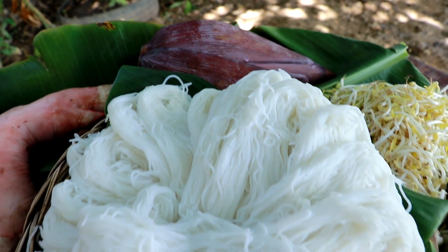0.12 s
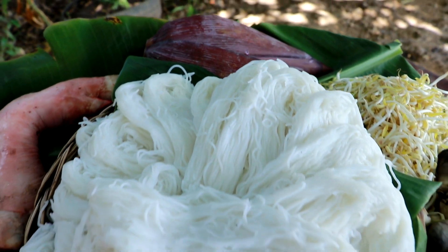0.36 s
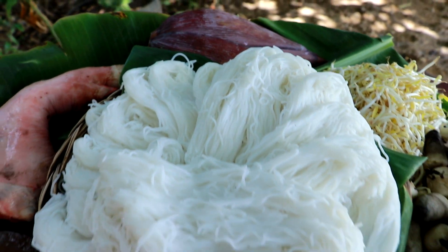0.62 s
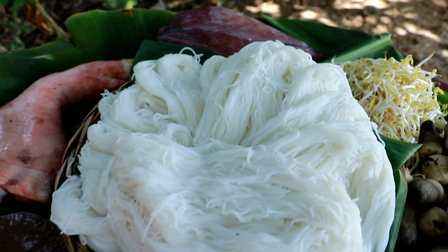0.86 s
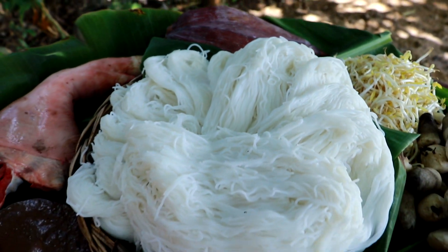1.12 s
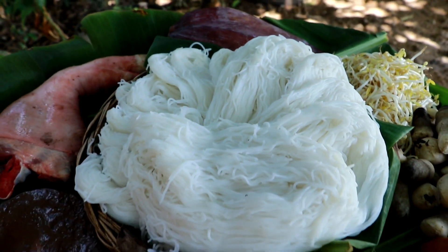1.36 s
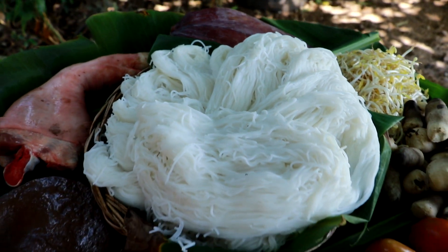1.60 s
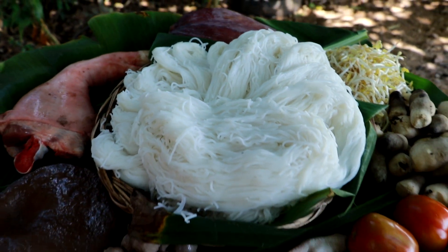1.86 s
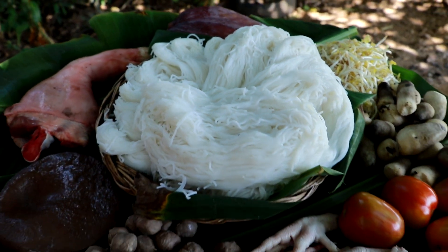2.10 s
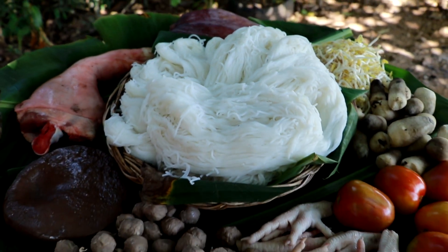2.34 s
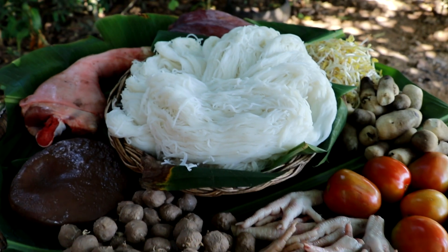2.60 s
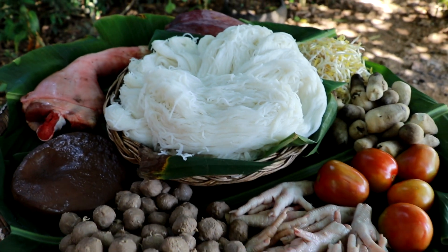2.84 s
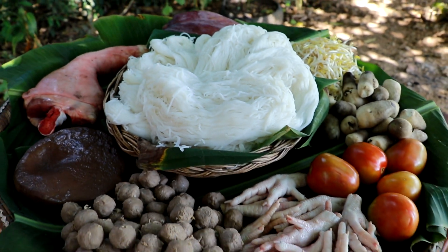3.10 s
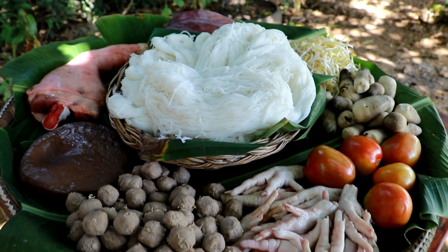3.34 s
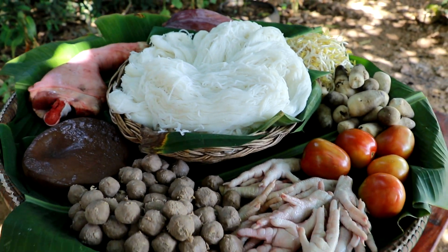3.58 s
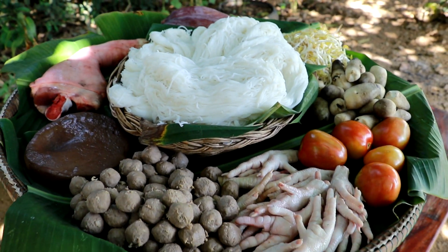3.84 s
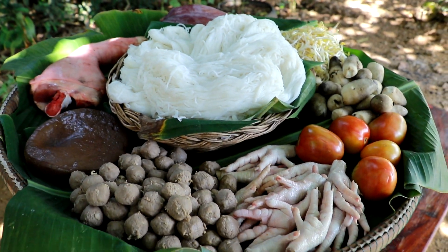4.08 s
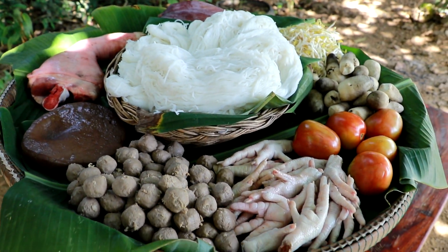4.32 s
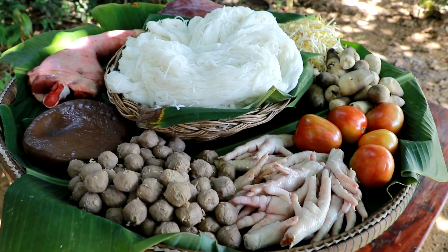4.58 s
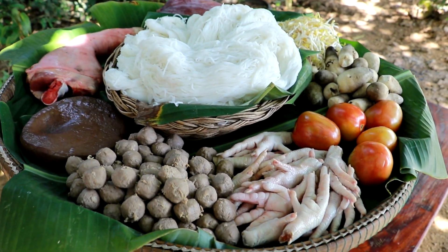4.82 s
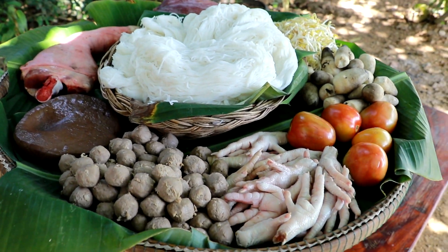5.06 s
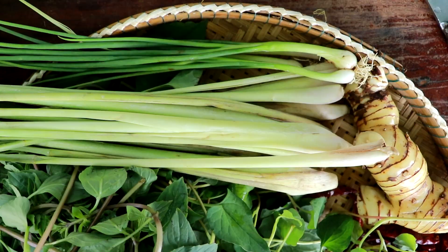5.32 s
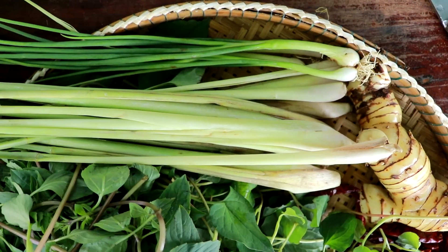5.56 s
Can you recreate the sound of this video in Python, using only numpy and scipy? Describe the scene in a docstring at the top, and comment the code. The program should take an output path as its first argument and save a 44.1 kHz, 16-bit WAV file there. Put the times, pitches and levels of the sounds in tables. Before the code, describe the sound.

Outdoors in a quiet garden, a handheld camera's stereo microphone picks up soft leafy hiss and low rumble. An insect trills in short high phrases about every second, while a small bird sings quick gliding whistles in the first two seconds. Small lens motor ticks come irregularly up close; a plastic snap falls after four seconds, then a tiny silent cut, fuller background, and a loud button click on the right.

```python
"""Shady garden near a handheld camera

An insect trills in strokes of falling pitch and a small bird sings in gliding whistles, with echoes of decaying noise.
Behind them, shaped noise makes a far rumble, leafy hiss and blurred calls; a wavering tone makes a faint hum.
Up close, sharp knocks and fading noise ring the resonances of the ticking lens motor, the snapping shell and
a clicking button; a finger tap is one short, soft tone. A brief silence joins two shots with different backgrounds.
"""
import sys
import numpy as np
from scipy import signal
from scipy.fft import rfft, irfft, next_fast_len
from scipy.io import wavfile
from scipy.ndimage import uniform_filter1d, map_coordinates

SR = 44100
rng = np.random.default_rng(int(sys.argv[2]) if len(sys.argv) > 2 else 0)


def wav_out(sig):
    """Save sig, one row per channel (or a flat mono array), as 16-bit PCM at SR to the path in sys.argv[1]."""
    wavfile.write(sys.argv[1], SR, np.round(np.clip(np.atleast_2d(sig).T, -1, 1) * 32767).astype(np.int16))


def voltage_ratio(decibels):
    """Convert decibels (scalar or array-like) to amplitude ratios, 20 dB per decade."""
    exponent = np.asarray(decibels, float) / 20
    return 10 ** exponent


N = 250929  # length in samples
GAP_START_S, GAP_END_S = 5.262, 5.3218  # silence between the two shots


def unit(x):
    """Scales a sound to rms 1."""
    return x / np.sqrt(np.mean(x ** 2) + 1e-20)


def along(points, hz):
    """Reads a curve of (Hz, value) points on a logarithmic frequency axis."""
    f, v = np.transpose(points)
    return np.interp(np.log(hz + 1), np.log(f + 1), v)


def wobble(rate):
    """A smooth random curve with this many random points a second."""
    points = rng.standard_normal(int(N * rate / SR) + 4)
    return map_coordinates(points, [np.arange(N) * rate / SR])


def filtered(x, response):
    """Shapes a sound by a response, real or complex, that depends on frequency."""
    m = next_fast_len(x.shape[-1] + 8192)
    spectrum = rfft(x, m) * response(np.fft.rfftfreq(m, 1 / SR))
    return irfft(spectrum, m)[..., :x.shape[-1]]


def resonances(peaks):
    """The response of parts that ring at their own pitches, with alternating signs."""
    def response(f):
        total = 0
        for k, (centre, width, db) in enumerate(peaks):
            ring = 1j * f * width / (centre * centre - f * f + 1j * f * width)
            total = total + (-1) ** k * voltage_ratio(db) * ring
        return total
    return response


def add(track, s, sound):
    """Mixes a sound into a track, starting at s seconds."""
    at = round(s * SR)
    track[..., at:at + sound.shape[-1]] += sound[..., :N - at]


def sides(pan_db):
    """Left and right gains that differ by pan_db."""
    return voltage_ratio([[pan_db / 2], [-pan_db / 2]])


def whistle(hz, fullness):
    """A pure tone along a pitch path, rising and fading; low fullness gives a flat top."""
    envelope = np.sin(np.linspace(0, np.pi, len(hz))) ** fullness
    phase = 2 * np.pi * np.cumsum(hz) / SR + rng.uniform(0, 2 * np.pi)
    return envelope * np.sin(phase)


def glide(length, start_hz, mid_hz, end_hz):
    """A pitch path curving smoothly (a parabola) through start, middle and end."""
    u = np.linspace(0, 1, round(length * SR))
    return start_hz * (1 - u) * (1 - 2 * u) + 4 * mid_hz * u * (1 - u) + end_hz * u * (2 * u - 1)


def foliage(x, t60, delay):
    """Scattered echoes off leaves and trunks: decaying noise, different at each port."""
    t = np.arange(SR // 2) / SR
    tail = rng.standard_normal((2, len(t))) * voltage_ratio(-60 * t / t60) * (t > delay)
    return signal.fftconvolve(x[None], tail / np.linalg.norm(tail[0]), axes=1)[:, :N]


# How alike the background is at left and right.
# Each row: frequency in Hz, likeness from 0 (unrelated) to 1 (same); higher values count as 1.
LIKENESS = [(60, 1.48), (180, 0.28), (550, 0.1575), (1650, 0.0036), (4970, 0.0333), (15000, 0.06)]
# How the background leans to one side. Each row: frequency in Hz, left over right in dB.
SIDE_LEAN = [(60, -6), (180, -0.5), (550, 2.0), (1650, 2.0), (4970, 2), (15000, 1.5)]


def rush(spectrum, patchy_db):
    """Stereo noise with patches of random gain over time and pitch; its left-right average has rms 1."""
    patches = signal.stft(rng.standard_normal((2, N)), nperseg=512)[2]
    field = uniform_filter1d(rng.standard_normal(patches.shape[1:]), 6, 0)
    field = uniform_filter1d(field, 12, 1)
    pair = signal.istft(patches * voltage_ratio(patchy_db * unit(field)), nperseg=512)[1][:, :N]

    def shared_and_opposed(hz):
        angle = np.arccos(np.clip(along(LIKENESS, hz), -1, 1)) / 2
        return voltage_ratio(along(spectrum, hz)) * [np.cos(angle), np.sin(angle)]

    mid, side = filtered(pair, shared_and_opposed)
    both = np.array([mid + side, mid - side])
    both = filtered(both, lambda hz: voltage_ratio(np.outer([.5, -.5], along(SIDE_LEAN, hz))))
    return both / np.sqrt(np.mean(both.mean(0) ** 2))


# Colour of the far rumble in the first shot. Each row: frequency in Hz, relative level in dB per Hz.
FIRST_RUMBLE = [(12, -59), (20, -10.5), (64, -1), (81, -0.5), (97, -9.5), (108, -9), (140, -3.5),
                (182, -14), (199, -12), (260, -25.5), (340, -36.5), (570, -120)]
# Colour of the rumble in the second shot. Each row: frequency in Hz, relative level in dB per Hz.
SECOND_RUMBLE = [(8.8, -42), (15, -14.5), (86, -0.5), (140, -6), (162, -13), (258, -17.5), (306, -13),
                 (358, -22), (450, -19.5), (580, -48), (990, -120)]


def far_rumble():
    """Low noise whose level wavers slowly; its colour and level differ between the shots."""
    second = np.arange(N) / SR > GAP_START_S
    level_db = np.where(second, -46.5, -56)
    low = np.where(second, rush(SECOND_RUMBLE, patchy_db=0.59), rush(FIRST_RUMBLE, patchy_db=0.3))
    return voltage_ratio(level_db + 0.583 * wobble(2.848)) * low


# Colour of the leafy hiss. Each row: frequency in Hz, relative level in dB per Hz.
HISS_COLOUR = [(110, -19), (180, -1), (205, -6), (283, -1), (727, -5), (784, -5.5), (862, -6), (1000, -6),
               (1430, -7.5), (1980, -9.5), (5080, -18), (7990, -14.5), (13300, -15.5), (15500, -13.5),
               (16400, -35.5)]


def leafy_hiss():
    """Patchy noise with a slightly wavering level, a little stronger in the second shot."""
    second = np.arange(N) / SR > GAP_START_S
    level_db = np.where(second, -53.5, -55.5)
    return voltage_ratio(level_db + 0.162 * wobble(6)) * rush(HISS_COLOUR, patchy_db=1.4433)


# A faint far hum that comes and goes; the last level holds.
# Each row: time in seconds, middle level in dB, around which it wavers.
HUM_LEVELS = [(0.0, -62.5), (0.55, -70), (1.19, -63.5), (1.62, -87), (2.0, -70.5)]


def hum():
    """A low tone whose pitch and level both waver."""
    s, db = np.transpose(HUM_LEVELS)
    level_db = np.interp(np.arange(N) / SR, s, db) + 2.7 * wobble(8.7)
    hz = 395 + 5 * wobble(10)
    return voltage_ratio(level_db) * np.sin(2 * np.pi * np.cumsum(hz) / SR)


# Insect phrases: a soft quick lead-in, then strong slow strokes.
# Each row: start in seconds, first strong stroke in seconds, end in seconds, soft level in dB, strong level in dB.
# The levels come before growth, chance, balance and echoes. No strong strokes follow if the end is
# earlier than the first strong stroke, or only just after it.
INSECT_PHRASES = [(0.024, 0.188, 0.4256, -63, -54.5), (0.943, 1.225, 1.476, -63, -55),
                  (1.968, 2.261, 2.488, -64, -55), (3.03, 3.317, 3.62, -64.5, -55.5),
                  (4.054, 4.385, 4.603, -62, -55), (5.181, 5.282, 4.62, -60.5, -59),
                  (5.476, 5.72, 5.73, -64.5, -56)]


def strokes():
    """Lists every wing stroke as start s, length s, middle pitch Hz and dB; the lead-in grows louder."""
    soft_gap_s, soft_length_s, soft_hz = 0.0405, 0.0267, 6830
    strong_gap_s, strong_length_s, strong_hz = 0.0607, 0.036, 6740
    swell_db = 6.5  # growth over the whole lead-in
    rows = []
    for start, strong, end, soft_db, strong_db in INSECT_PHRASES:
        # the quick strokes are spread evenly, so their gap is only near soft_gap_s
        soft_count = round((strong - start) / soft_gap_s)
        for u in np.linspace(0, 1, soft_count, endpoint=False):
            rows.append((start + (strong - start) * u, soft_length_s, soft_hz, soft_db + swell_db * u ** 2))
        for k in range(round((end - strong) / strong_gap_s)):
            rows.append((strong + k * strong_gap_s, strong_length_s, strong_hz, strong_db))
    return rows


def insect():
    """Each wing stroke slows down, so its pitch falls; near leaves smear it and far trees prolong it."""
    scatter_hz, scatter_db = 43.8, 1.5  # chance from stroke to stroke
    out = np.zeros(N)
    for s, length, hz, db in strokes():
        hz, db = rng.normal([hz, db], [scatter_hz, scatter_db])
        # long strokes fall further
        path = glide(length, hz + 18000 * length, hz, hz - 9000 * length)
        add(out, s, voltage_ratio(db) * whistle(path, fullness=0.19))
    direct = out * sides(-11.0) * voltage_ratio(-2.0)
    near = voltage_ratio(-4.5) * foliage(out, t60=0.0514, delay=0.003)
    far = voltage_ratio(-3.5) * foliage(out, t60=0.29, delay=0.022)
    return direct + near + far


# Lens motor steps.
# Each row: start in seconds, peak in dB before left-right balance, loose rattle in dB relative to the knocks.
MOTOR_STEPS = [(0.1627, -31.5, -18), (0.2005, -31, -15.5), (0.2361, -33.5, -24), (0.244, -33, -21),
               (0.2729, -35, -20.5), (0.851, -47.5, -13), (1.1626, -31.5, -21), (1.484, -37.5, -18.5),
               (2.603, -33, -22), (2.8009, -31, -15), (3.0812, -32, -14), (3.116, -36.5, -17.5),
               (3.645, -43, -15), (4.043, -32, -17), (4.316, -37, -7), (5.083, -32, -19.5),
               (5.242, -37, -11.5), (5.3213, -35.5, -18), (5.35, -35, -9.5), (5.3715, -35.5, -14.5),
               (5.3999, -31, -6.5)]
# Lens barrel as the left port hears it. Each row: resonance in Hz, width in Hz, relative level in dB.
LEFT_BARREL = [(1233, 467, 16.5), (1923, 377, 13), (3046, 296, 7), (3600, 220, -0.5)]
# Lens barrel as the right port hears it. Each row: resonance in Hz, width in Hz, relative level in dB.
RIGHT_BARREL = [(1261, 243, -5), (1960, 119.7, 3.5), (2595, 414, 2.5), (2930, 254, 6), (3600, 306, -6)]


def lens():
    """A motor step knocks the same few gear teeth in quick turn; each port hears the barrel its own way."""
    out, t = np.zeros((2, N)), np.arange(SR // 20) / SR
    knock_at = np.round(np.array([0, .00138, .00276, .0045]) * SR).astype(int)
    for s, db, rattle_db in MOTOR_STEPS:
        teeth = np.zeros(len(t))
        teeth[knock_at] = voltage_ratio(rng.normal([2.5, 1.5, -4.5, -11.5], 0.53))
        # a short burst of rattle with a longer, weaker tail
        loose = voltage_ratio(rattle_db) * (np.exp(-(t / 0.00712) ** 2) + 0.23 * voltage_ratio(-60 * t / 0.0385))
        rattle = teeth + loose * rng.standard_normal((2, len(t)))
        left = filtered(rattle[0], resonances(LEFT_BARREL))
        right = filtered(rattle[1], resonances(RIGHT_BARREL))
        pair = np.array([left, right])
        add(out, s, voltage_ratio(db) * sides(-8.5) * pair / abs(pair).max(1, keepdims=True))
    return out


# Far calls blurred by the trees.
# Each row: start in seconds, length in seconds, pitch in Hz, width in Hz, level in dB before fading in and out.
BLURRED_CALLS = [(0.198, 0.14, 4280, 300, -63), (.55, 0.098, 8000, 500, -64),
                 (1.292, 0.09, 8000, 500, -64.5), (2.08, .1, 8100, 500, -64.5),
                 (0.679, 0.47, 4400, 300, -64.5), (2.389, .2, 4210, 300, -61.5),
                 (4.879, .08, 6600, 400, -64.5), (5.151, 0.068, 3900, 500, -64.5)]


def far_calls():
    """Narrow bands of noise that swell and fade, separate at left and right."""
    out = np.zeros((2, N))
    for s, length, hz, width, db in BLURRED_CALLS:
        n = round(length * SR)
        blur = filtered(rng.standard_normal((2, n)), lambda f: np.exp(-((f - hz) / width) ** 2))
        add(out, s, voltage_ratio(db) * np.hanning(n) * unit(blur))
    return out


# The bird's double falls. Levels come before huskiness, balance and echoes.
# Each row: start in seconds, length of the first fall in seconds, its end pitch in Hz, its level in dB,
# opening warble level in dB.
DOUBLE_FALLS = [(0.497, 0.0246, 3600, -62, -72.5), (0.717, 0.0236, 3700, -57.5, -65.5),
                (0.891, 0.024, 3740, -54, -59.5), (1.056, 0.025, 3770, -54.5, -55.5),
                (1.227, 0.0194, 3640, -45.5, -53.5), (1.3976, 0.022, 3860, -48, -50),
                (1.568, 0.0227, 3960, -45, -50.5), (1.751, 0.0219, 4200, -46.5, -47.5)]
# The bird's rising answers: a rise, a steep chip and a hook. Levels as above.
# Each row: start in seconds, level in dB, hook length in seconds, hook start pitch in Hz, hook end pitch in Hz.
RISING_ANSWERS = [(0.859, -68, 0.02, 3150, 3500), (0.985, -64, 0.02, 3130, 3500),
                  (1.318, -59, 0.025, 3097, 3750), (1.486, -57, 0.029, 3190, 4400),
                  (1.667, -57.5, 0.0325, 4010, 4510)]


def bird():
    """Gliding whistles, warbles and chips from a tree, in a slightly husky voice, with echoes."""
    out = np.zeros(N)
    t = np.arange(round(0.025 * SR)) / SR  # the length of a warble
    warble_hz = 5500 + 35000 * t + 550 * np.cos(2 * np.pi * 125 * t)
    mean_db = np.mean([row[3] for row in DOUBLE_FALLS])
    for s, length, end_hz, db, warble_db in DOUBLE_FALLS:
        add(out, s - 0.016, voltage_ratio(warble_db) * whistle(warble_hz, fullness=1.0))
        path = glide(length, 5852, 4400, end_hz)
        swell_db = 8 * np.linspace(-.7, .3, len(path))  # the first fall grows louder as it sinks
        add(out, s, voltage_ratio(db + swell_db) * whistle(path, fullness=0.7))
        after_db = -53 + 0.78 * (db - mean_db)  # follows the first fall's effort only in part
        add(out, s + 0.0265, voltage_ratio(after_db) * whistle(glide(0.0165, 5040, 4408, 3900), fullness=1.0))
    for s, db, hook_s, start_hz, end_hz in RISING_ANSWERS:
        rise = whistle(glide(0.0256, 2983, 3700, 3900), fullness=0.89)
        chip = whistle(glide(0.00486, 7060, 6020, 4400), fullness=0.45)
        hook = whistle(glide(hook_s, start_hz, 3305, end_hz), fullness=0.71)
        add(out, s, voltage_ratio(db) * rise)
        add(out, s + 0.023, voltage_ratio(db + 4.5) * chip)
        add(out, s + 0.039, voltage_ratio(db) * hook)
    out *= voltage_ratio(2.5 * wobble(300))  # husky: the level flutters quickly
    near = voltage_ratio(-8.0) * foliage(out, t60=0.032, delay=0.0034)
    far = voltage_ratio(-9) * foliage(out, t60=0.464, delay=0.0068)
    return out * sides(-6.5) + near + far


def finger_tap():
    """A finger taps softly: one short, smoothly rising and fading low tone."""
    out, t = np.zeros((2, N)), np.arange(SR // 100) / SR
    tap = np.sin(np.pi * t / t[-1]) ** 2 * np.sin(2 * np.pi * 440 * t)
    add(out, .8125, voltage_ratio(-42) * tap * sides(1.5))
    return out


def struck(rows, peaks, rattle_db):
    """A sharp blow rings a part, a fading rattle follows; the left port hears the blow a little later."""
    out, t = np.zeros((2, N)), np.arange(SR // 16) / SR
    for s, db, pan_db, bright_db, t60 in rows:
        crack = voltage_ratio(rattle_db - 60 * t / t60) * rng.standard_normal((2, len(t)))
        crack[0, 10] -= 1  # the blow at the left, in samples
        crack[1, 0] -= 1  # the blow at the right

        def response(hz):
            tilt = voltage_ratio(bright_db) ** np.clip(hz / 8000, 0, 1)
            return tilt * resonances(peaks)(hz)

        pair = filtered(crack, response)
        add(out, s, voltage_ratio(db) * sides(pan_db) * pair / abs(pair).max(1, keepdims=True))
    return out


# Snaps of the plastic body.
# Each row: start in seconds, peak in dB before left-right balance, left over right in dB,
# brightness in dB (full from 8000 Hz up), time for the rattle to fall by 60 dB in seconds.
SHELL_SNAPS = [(4.299, -25.5, -10.5, -8.5, 0.00624), (4.3029, -19.5, 1, 2.5, 0.0242),
               (5.3918, -32.5, -18, -4.5, 0.0076)]
# Resonances of the plastic shell. Each row: frequency in Hz, width in Hz, relative level in dB.
SHELL_RESONANCES = [(327, 204.5, -9), (500, 120, -3), (853, 180, 0), (2050, 380, 5), (2880, 850, -7),
                    (3900, 500, -5), (5200, 800, -8.5), (8200, 1040, -7), (10700, 6000, -19.5)]


def shell():
    """The plastic shell snaps and rings at its resonances."""
    return struck(SHELL_SNAPS, SHELL_RESONANCES, rattle_db=-17.5)


# A button's click by the right port.
# Each row: start in seconds, peak in dB before left-right balance, left over right in dB,
# brightness in dB (full from 8000 Hz up), time for the rattle to fall by 60 dB in seconds.
BUTTON_PRESS = [(5.4272, -11.5, -21.5, -1, 0.009)]
# Resonances of the button. Each row: frequency in Hz, width in Hz, relative level in dB.
BUTTON_RESONANCES = [(280, 360, -15), (737, 547, -3), (1237, 760, 3), (2083, 993, 1), (3900, 1010, -6.5),
                     (4990, 850, -10), (8330, 2010, -3), (10530, 1360, 2.5), (12060, 1500, -4)]


def button():
    """A button clicks: a blow with a weaker rattle than the shell's."""
    return struck(BUTTON_PRESS, BUTTON_RESONANCES, rattle_db=-24.5)


def scene():
    """Everything at the two ports."""
    background = far_rumble() + leafy_hiss() + hum() + far_calls()
    handling = lens() + finger_tap() + shell() + button()
    return background + insect() + bird() + handling


def roll_off(x):
    """The treble ends steeply here."""
    return signal.sosfilt(signal.butter(12, 16510, fs=SR, output="sos"), x)


def record(dry):
    """The microphone rolls off the treble; the edit mutes the join between shots after a quick fade."""
    t = np.arange(N) / SR
    microphone = signal.butter(2, 10870, fs=SR, output="sos")  # top of its range in Hz
    heard = signal.sosfilt(microphone, dry)
    fade = np.clip((GAP_START_S - t) / .004, 0, 1)
    return roll_off(heard * np.where(t > GAP_END_S, 1, fade))


dry = scene()
out = record(dry)
wav_out(out)
```